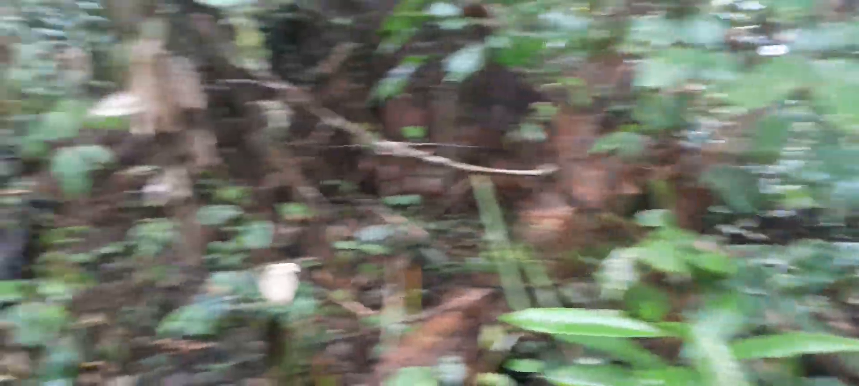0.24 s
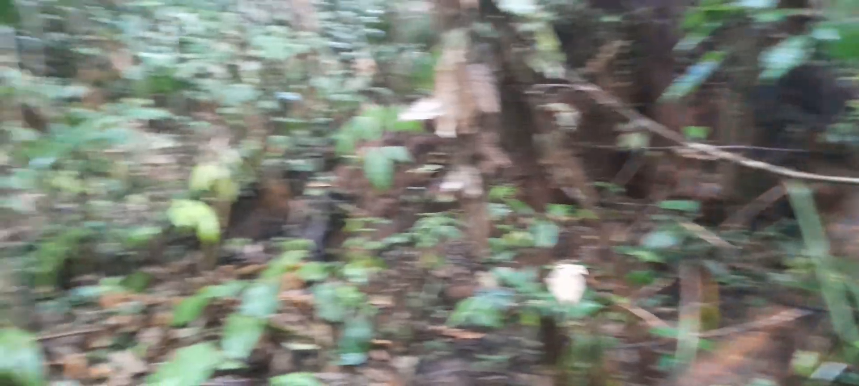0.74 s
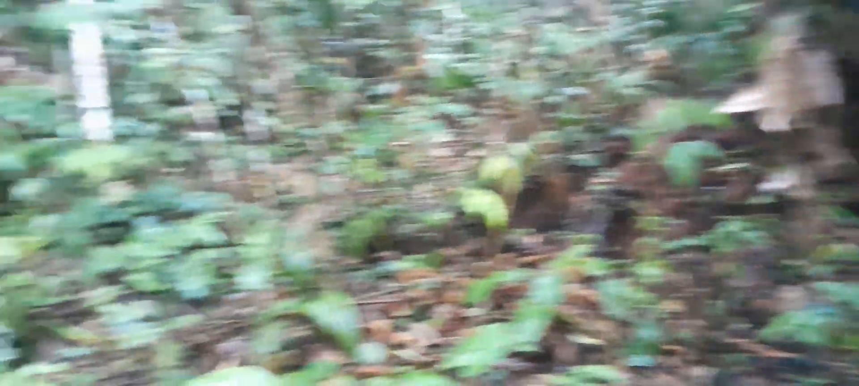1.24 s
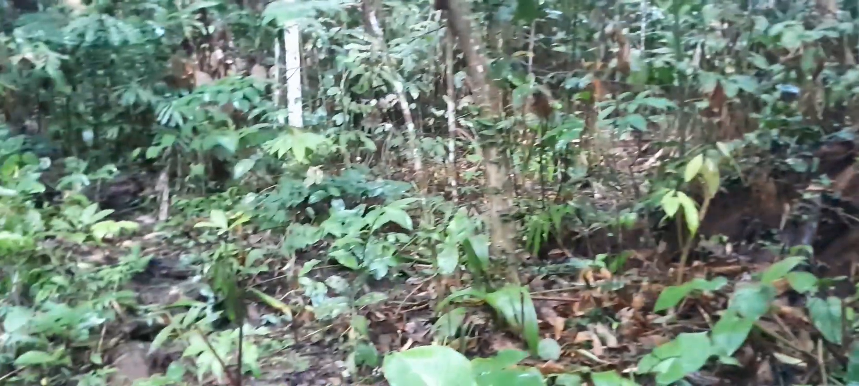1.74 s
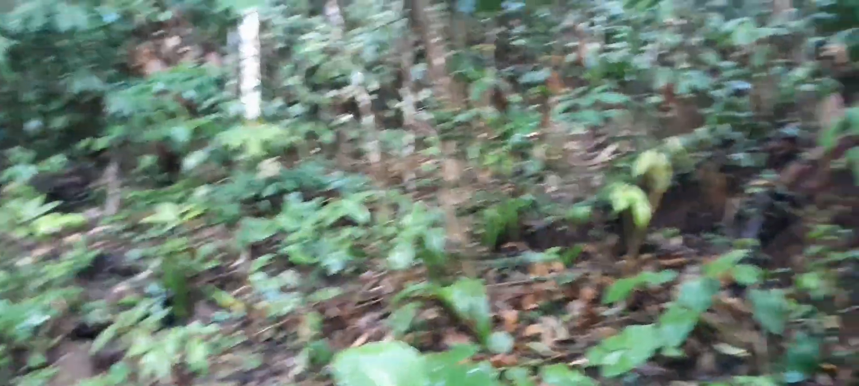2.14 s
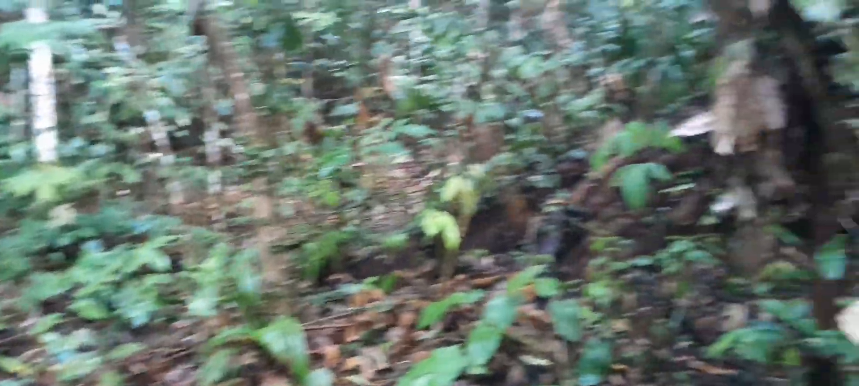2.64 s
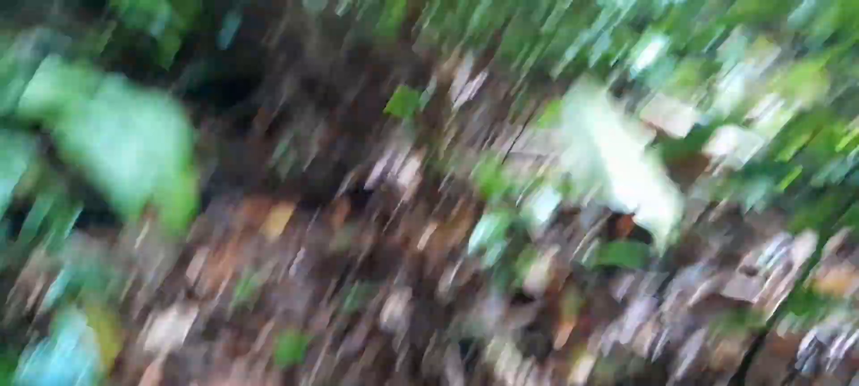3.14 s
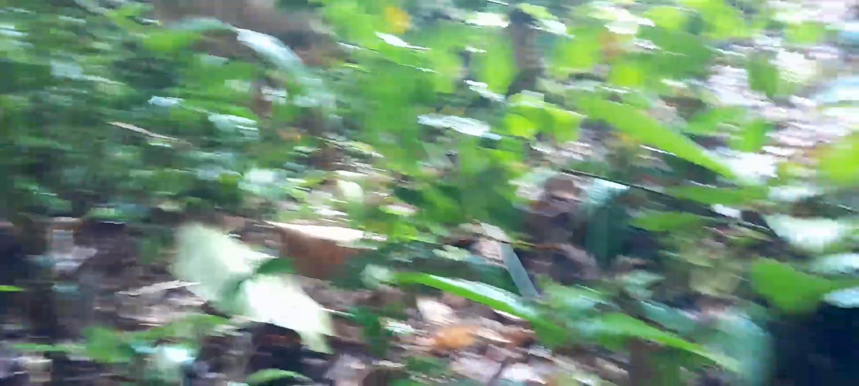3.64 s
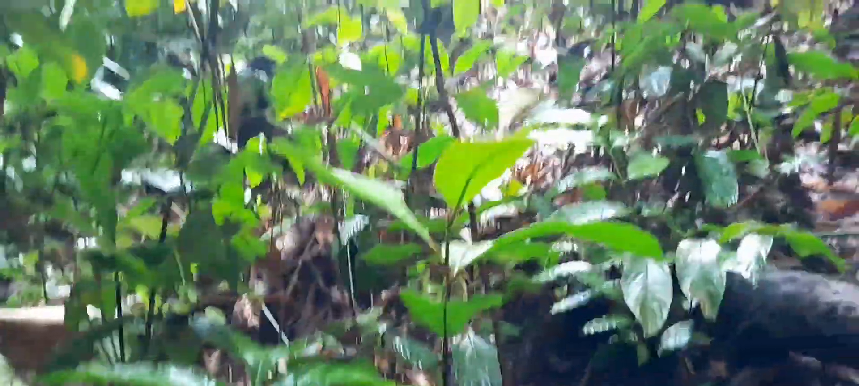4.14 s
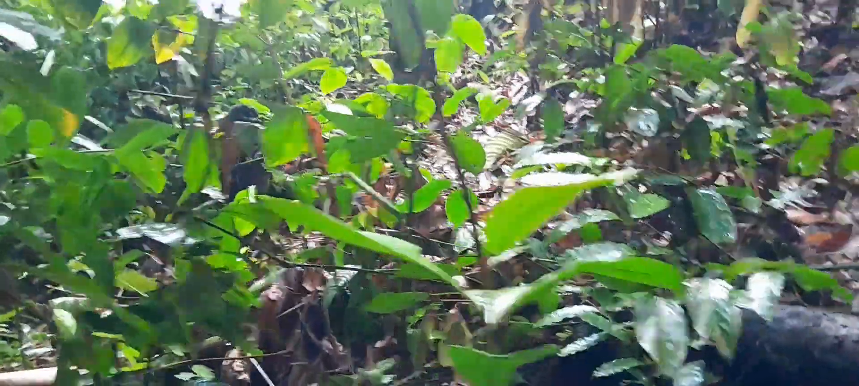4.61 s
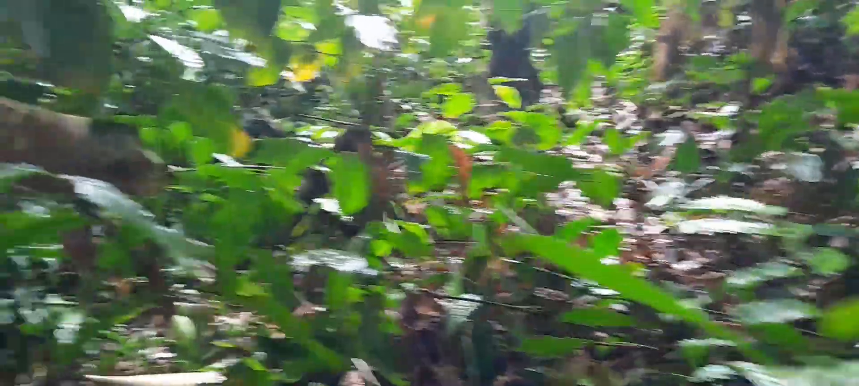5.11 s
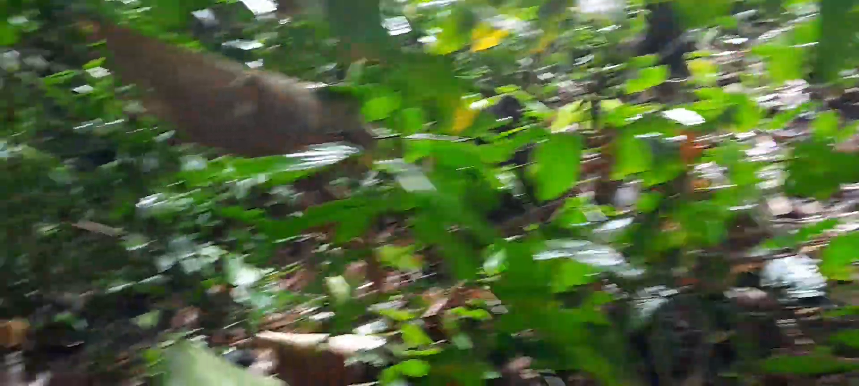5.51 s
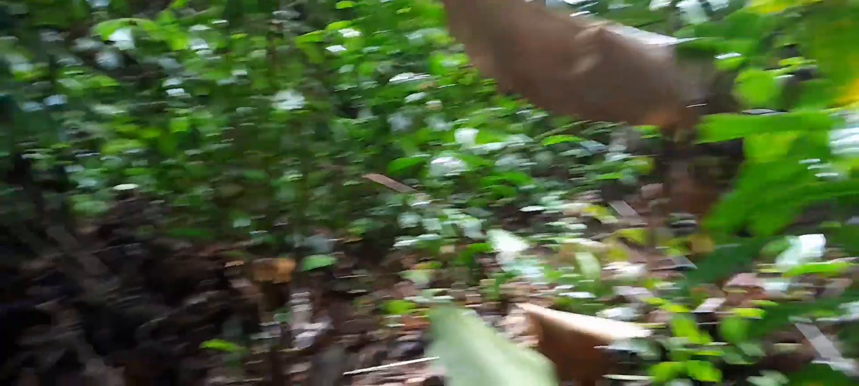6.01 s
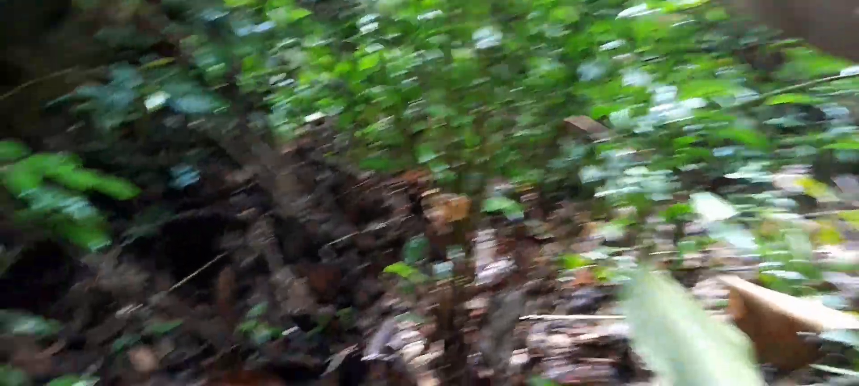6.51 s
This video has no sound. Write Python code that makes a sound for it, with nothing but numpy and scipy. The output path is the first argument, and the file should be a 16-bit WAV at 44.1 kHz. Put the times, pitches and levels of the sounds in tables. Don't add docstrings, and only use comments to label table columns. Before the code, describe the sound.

Outdoors in tropical forest, a handheld stereo microphone hears quiet air and a steady, shimmering high insect chorus throughout. From 0 to 2.9 s, footsteps crackle softly in leaf litter with dull twig ticks, notably around 1.0, 1.6 and 2.1; faint buzzy bird slides echo at 0.2, 1.5 and 2.6, and a distant caller hoots near 0.4 and 2.4. At 2.92 comes a tiny silence, then the ambience changes. Finger bumps at 3.0 lead to a scrape and a very loud, sharp knock at 3.08, mostly left, dying in rumble and rubbing. Soft low coos run from 2.94 to 3.6, then return in scattered groups. A rapid pulsing cricket swells, strongest around 4.2-4.5, fading by 6.2, beside a thin whistling one. Nearer twigs snap, especially 3.15-3.4. Bright buzzy chirps burst at 4.1-4.6; six quick upward whistles follow from 4.9 to 5.9. Leaf steps crunch more strongly to the end, 6.76.

```python
import sys
import numpy as np
from scipy import signal
from scipy.io import wavfile

SR = 44100
rng = np.random.default_rng(int(sys.argv[2]) if len(sys.argv) > 2 else 0)


def boost(x):
    u = np.asarray(x, float) / 20
    return 10 ** u


def int16_out(signal):
    q = np.round(np.clip(np.atleast_2d(signal).T, -1, 1) * 32767)
    wavfile.write(sys.argv[1], SR, q.astype(np.int16))


N = 297939

SPLICE_START_S, SPLICE_END_S = 2.9185, 2.9345

# frequency_hz, density_db_per_hz, second_scene_added_db
AIR = [(25, -130, 10), (41, -107, -2), (62, -94, 5.5), (105.5, -101, 2.5), (200, -107, 0), (400, -110, 5.5),
       (800, -107, 3), (1200, -110, 1.5), (2590, -108, -9), (3670, -106, -14), (6560, -108, 11),
       (8000, -112, -12.5), (12240, -113, 11), (15500, -113, -1.5)]
# frequency_hz, correlation (-1 to 1)
LIKENESS = [(60, 0.42), (180, 0.21), (550, 0.56), (1650, -0.66), (4970, 0.36), (15000, -0.82)]
# frequency_hz, left_minus_right_db
PORTS = [(60, 0), (700, 2.5), (1300, -3), (2400, -1), (4400, 7), (8000, -1.5), (11000, -6), (15000, -10)]
# centre_hz, width_hz, first_scene_db, second_scene_db, left_minus_right_db
CHORUS = [
    (1850, 680, -74, -67.5, -5),
    (3100, 700, -74, -77, 20),
    (5650, 470, -60.5, -63, -0.5),
    (7553, 405, -57.5, -55, -1),
    (11270, 830, -85, -84, -38),
    (15300, 420, -112, -85, 14),
    (11343, 49, -87, -100, -12),
]
# time_s, pitch_hz, second_partial_db, third_partial_db
CALL = [(0, 1012, -24, -4), (.03, 1025, -14, -3.5), (.07, 1034, 3, 1), (.12, 1055, 4.5, -0.5),
        (.17, 1064, 4.5, -1), (.25, 1068, -3, -8.5), (.33, 1060, -13, -15)]
# start_s, second_partial_db, third_partial_db, time_stretch (ratio)
CALLS_AT = [
    (0.368, -67, -60, 1.02),
    (2.405, -62.5, -62, 0.873),
]
# share_of_length (0-1), share_of_glide (0-1), level_db
BUZZ_SHAPE = [(0, 0.075, -11), (.35, 0.72, -10.5), (1, 0.84, -21.5)]
# share_of_length (0-1), share_of_glide (0-1), level_db
FLICK_SHAPE = [(0, 0.0079, -17), (.25, 0.0535, -14.5), (0.55, .4, -13), (.85, .95, -2), (1, 0.94, -4)]
# start_s, length_s, first_hz, last_hz, level_db
BUZZES = [
    (0.184, 0.19, 6800, 7400, -52.5),
    (1.453, 0.13, 7630, 6780, -50.5),
    (2.565, 0.27, 6410, 7160, -58),
    (4.132, 0.11, 7160, 4960, -45.5),
    (4.174, 0.07, 7300, 8020, -40),
    (4.301, 0.042, 8020, 8260, -33),
    (4.345, 0.065, 8340, 7900, -43.5),
    (4.511, 0.11, 6220, 4720, -44),
    (4.555, 0.11, 6460, 5360, -47),
    (6.241, 0.17, 5900, 4970, -52),
]
# start_s, length_s, first_hz, last_hz, level_db
FLICKS = [
    (4.918, 0.033, 5780, 7750, -41),
    (5.195, 0.045, 6000, 7610, -43),
    (5.365, 0.046, 6170, 7880, -41.5),
    (5.554, 0.046, 6500, 7480, -43),
    (5.765, .035, 6750, 7360, -41.5),
    (5.905, 0.025, 7330, 7630, -34),
]
# time_s, level_db
CRICKET = [(2.94, -60), (3.3, -57.5), (3.47, -54), (3.88, -51.5), (3.96, -61), (4.05, -51.5), (4.2, -48),
           (4.45, -47.5), (4.75, -55), (5.15, -51.5), (5.4, -59), (5.7, -58), (6.05, -64), (6.2, -79),
           (6.32, -82), (6.45, -87), (6.76, -78)]
# start_s, length_s, level_db, pitch_hz
PHRASES = [(3.14, 0.06, -74, 3160), (3.24, 0.21, -74, 3150), (3.46, 0.26, -71, 3125),
           (3.72, 0.59, -71, 3180), (4.34, 0.16, -71, 3160), (4.51, 0.24, -72, 3145),
           (4.75, .09, -71, 3125), (4.83, .14, -77, 3125), (4.95, .12, -75, 3185), (5.05, 0.19, -70, 3180),
           (5.26, 0.2, -70.5, 3160), (5.46, 0.31, -71.5, 3140), (5.8, .21, -73, 3125),
           (6.0, 0.22, -73, 3185), (6.29, 0.15, -71, 3180), (6.52, 0.24, -71.5, 3160)]
# start_s, length_s, first_hz, last_hz, level_db
COOS = [(.09, 0.069, 455, 467, -83), (2.935, 0.16, 511.6, 515, -50), (3.075, 0.142, 505.4, 508, -51.5),
        (3.2, 0.14, 499.7, 516.6, -52.5), (3.335, 0.11, 499, 512, -56), (3.42, 0.12, 503.5, 519, -58),
        (3.525, 0.086, 500.4, 472, -50.5), (3.578, 0.083, 460, 458, -58.5), (3.799, 0.063, 385, 440, -66),
        (3.837, .055, 438, 457, -59.5), (3.884, 0.067, 440, 417, -69), (4.16, 0.11, 471, 456, -56),
        (4.262, 0.034, 440, 440, -58.5), (4.297, 0.18, 438, 426, -56.5), (4.476, .15, 430.7, 422.4, -66.5),
        (5.549, 0.069, 379, 426, -68.5), (5.594, 0.069, 443, 400, -68.5), (5.816, 0.037, 400, 440, -61),
        (5.841, 0.14, 435, 426, -64), (6.025, .1, 461, 448, -61), (6.111, 0.043, 440, 433, -67),
        (6.159, 0.18, 458.4, 456, -61.5), (6.481, 0.071, 376, 465, -63), (6.547, 0.16, 444, 446, -63.5),
        (6.645, 0.063, 447, 498, -61), (6.69, 0.1, 503, 505, -65)]
# share_of_length (0-1), share_of_glide (0-1), level_db
COO_SHAPE = [(0, 0, -3), (.35, .35, 0), (1, 1, -4)]
# time_s, left_minus_right_db, octave_db
DOVE_BEARING = [(0, 32, -6), (3.2, 18, -23), (3.9, 0, -12), (4.4, -2.5, -36), (5.6, 10.5, -15),
                (5.9, 7, -2), (6.1, 5, -18), (6.76, 4, -4)]
# start_s, length_s, centre_hz, width_octaves, level_db
SCUFFS = [(0.008, 0.48, 615, 0.99, -83), (1.007, 0.063, 696, 0.44, -78.5), (1.01, 0.061, 3230, 0.44, -73),
          (1.389, 0.04, 3500, 0.63, -76), (5.372, 0.11, 900, 1.2, -80), (6.078, 0.064, 1750, .3, -72),
          (2.078, 0.052, 735, 0.53, -79.5), (2.627, 0.059, 740, 0.12, -83), (4.19, 0.037, 246, 1.2, -78),
          (4.316, 0.12, 640, 1.1, -84), (4.99, 0.22, 800, 0.34, -84), (5.707, 0.16, 624, 0.8, -68.5),
          (6.424, 0.061, 1290, 3.6, -65.5)]
# start_s, length_s, level_db, colour_octaves above the lowest crackle
STEPS = [(0, 0.35, -69, 2), (0.241, 0.72, -63, 3.27), (0.995, 0.16, -60, 3.6), (1.318, 0.49, -64.5, 1.43),
         (1.706, 0.29, -59.5, 3.38), (1.956, 0.26, -72.5, 0.83), (2.203, 0.98, -64, 3.56),
         (2.716, 0.15, -65.5, 2.57), (2.93, 0.44, -59, 0.73), (3.203, 0.35, -61.5, 2.5),
         (3.429, 0.29, -63.5, 1.8), (3.633, 0.88, -74, 1.1), (4.256, 0.34, -65.5, 2.1),
         (4.474, 0.39, -61, 4.2), (4.903, 0.27, -73, 1.4), (5.348, 0.085, -59, 3.2),
         (5.564, 0.11, -62, 1.7), (5.662, 0.31, -63, 2.6), (5.822, 0.7, -62, 2.6), (6.053, 0.29, -64, 6.2),
         (6.255, 0.14, -58.5, 3.8), (6.34, 0.41, -64, 3.6), (6.572, 0.16, -55.5, 2.5),
         (6.657, 0.37, -57, 3.4)]
# time_s, left_minus_right_db
LEAVES_PAN = [(0, 6), (2.9, -3), (3.16, -5), (3.4, -1.5), (4.6, -4), (5.5, -4), (6.76, -2.5)]
# start_s, peak_db, left_minus_right_db, pitch_hz
FAR_SNAPS = [(0.47, -41, 6, 3570), (1.0135, -42, 16, 3260), (1.03, -45, -4, 2950), (1.094, -44, 0, 3900),
             (1.39, -52, 9, 3520), (1.545, -48.5, 0, 1370), (1.607, -39, -1, 4400), (1.793, -43, -8, 3560),
             (2.0748, -38, 16, 3100), (2.267, -45, 10, 3440), (2.763, -48.5, 22, 900)]
# start_s, peak_db, left_minus_right_db, pitch_hz
NEAR_SNAPS = [(3.151, -36.5, 14, 910), (3.237, -45, -4.5, 1250), (3.254, -43.5, -5, 1740),
              (3.279, -41, 2, 1015), (3.299, -41, 1, 1410), (3.3395, -35.5, -4, 1080), (3.33, -40, 0, 410),
              (3.3628, -39.5, -4, 1670), (3.398, -43, -16, 1760), (3.538, -42.5, -15, 1450),
              (4.309, -44, -7, 1620), (4.336, -45, -9, 1740), (4.577, -42, -4, 1757),
              (4.602, -39.5, -8, 1930), (4.825, -46, 12, 3100), (5.369, -39, -9, 940),
              (5.368, -42, -4, 4500), (5.986, -45, -3, 2070), (6.089, -40.5, -9, 1850),
              (6.3055, -47, -13, 5100), (6.447, -48, 8, 3650), (6.642, -36, -9, 860)]
# start_s, peak_db, left_minus_right_db, pitch_hz
BRIGHT_SNAPS = [
    (0.325, -54, -22, 908),
    (3.49, -54.5, -34, 1090),
    (4.682, -41.5, -3, 1970),
    (4.722, -40, -3, 1920),
    (4.781, -45, 10, 3180),
    (5.587, -34, -11, 1730),
    (6.169, -64, -22, 2110),
    (6.735, -48, -4, 3100),
]
# start_s, crack_db, crack_hz, thump_db, thump_hz
KNOCKS = [(2.757, -60, 200, -65, 74.5), (3.001, -20.5, 1840, -12.5, 530), (3.008, -44, 1200, -32, 149),
          (3.0421, -22, 2000, -40, 500), (3.0547, -18.5, 1750, -25, 610), (3.0648, -28, 1810, -36, 715),
          (3.0679, -15, 2320, -12.5, 780), (3.071, -25, 2210, -43, 600), (3.0779, 6.5, 5300, -2, 1380),
          (3.0867, -13, 5000, -6.5, 560), (3.099, -55, 3000, -22, 200), (3.098, -60, 300, -27, 69),
          (2.774, -80, 300, -65, 52), (3.122, -45, 900, -27, 450), (3.134, -41, 900, -45, 500),
          (3.016, -60, 900, -36, 180)]
# time_s, level_db
RUB = [(2.935, -46), (3.0, -45), (3.06, -42), (3.088, -36), (3.11, -43), (3.16, -48.5), (3.25, -94)]
# time_s, level_db
SCRAPE = [(3.062, -44), (3.067, -18), (3.076, -31.5), (3.084, -37)]


def rms_one(x):
    return x / np.sqrt(np.mean(x ** 2) + 1e-20)


def in_time(rows, quiet=None):
    s, *columns = np.transpose(rows)
    return [np.interp(np.arange(N) / SR, s, c, quiet, quiet) for c in columns]


def at_hz(points, hz, column=1):
    return np.interp(np.log(hz), np.log(np.array(points)[:, 0]), np.array(points)[:, column])


def band(x, low_hz, high_hz, order=2):
    return signal.sosfilt(signal.butter(order, [low_hz, min(high_hz, .45 * SR)], "band", fs=SR, output="sos"), x)


def drift(rate_hz):
    r = np.exp(-80 * np.pi * rate_hz / SR)
    slow = signal.lfilter([1], [1, -2 * r, r * r], rng.standard_normal(N // 40 + 2002))[2000:]
    return np.interp(np.arange(N) / 40, np.arange(len(slow)), rms_one(slow))


def pan(x, db):
    return np.array([x * boost(db / 2), x * boost(-db / 2)])


def ring(clicks, hz, t60_s):
    r, w = boost(-60 / (t60_s * SR)), 2 * np.pi * hz / SR
    return signal.lfilter([0, np.sin(w)], [1, -2 * r * np.cos(w), r * r], clicks + 1e-18)


def shaped(shape, s, length_s, first_hz, last_hz, db):
    glide_hz = last_hz - first_hz
    return [(s + along * length_s, first_hz + glide * glide_hz, db + more_db) for along, glide, more_db in shape]


def note(rows, fade_s):
    s, *columns = np.transpose(rows)
    span = np.arange(int(s[0] * SR), min(int(s[-1] * SR), N))
    hz, *columns = [np.interp(span / SR, s, c) for c in columns]
    window = np.clip(np.minimum(span / SR - s[0], s[-1] - span / SR) / fade_s, 0, 1)
    return span, 2 * np.pi * np.cumsum(hz) / SR, np.sqrt(2) * window, columns


def forest(x, t60_s):
    t = np.arange(int(t60_s * SR)) / SR
    echo = rng.standard_normal((2, len(t))) * boost(-60 * t / t60_s) * np.minimum(t / 0.0056, 1)
    return signal.fftconvolve(x[None], echo / np.sqrt(np.sum(echo ** 2) / 2), axes=1)[:, :N]


def burst(hz, cycles, soft):
    turns = np.arange(int(SR * .1)) * hz / SR
    return np.sin(2 * np.pi * turns) * boost(-60 * turns / cycles) * np.minimum(turns / soft, 1) * 1.53


def add(out, s, x):
    i = round(s * SR)
    out[:, i:i + x.shape[1]] += x[:, :N - i]


def air(second, patchy_db):
    out = 0
    edges = 22 * 2 ** np.arange(0, 10, .5)
    white = rng.standard_normal((2, 2, N)) * np.sqrt(SR / 2)
    for k, (low, high) in enumerate(zip(edges, edges[1:])):
        mid, side = band(white[k % 2], low, high)
        hz = np.sqrt(low * high)
        alike = np.clip(at_hz(LIKENESS, hz), -1, 1)
        level_db = at_hz(AIR, hz) + at_hz(AIR, hz, column=2) * second + patchy_db * drift(1.46)
        gain = pan(boost(level_db), at_hz(PORTS, hz))
        out = out + gain * (np.sqrt(1 + alike) * mid + np.sqrt(1 - alike) * side * [[1], [-1]])
    return out


def chorus(second, shimmer_db, swell_db):
    out = 0
    for hz, width_hz, first_db, second_db, pan_db in CHORUS:
        hiss = rms_one(band(rng.standard_normal((2, N)), hz - width_hz / 2, hz + width_hz / 2))
        level_db = np.where(second, second_db, first_db) + shimmer_db * drift(37) + swell_db * drift(5.8)
        out = out + hiss * pan(boost(level_db - 1.5), pan_db)
    return out


def far_caller():
    call, waver = np.zeros(N), drift(53)
    flutter = boost(3.5 * np.roll(waver, 5000))
    for s, second_db, third_db, stretch in CALLS_AT:
        rows = np.add(np.multiply(CALL, [stretch, 1, 1, 1]), [s, 0, second_db, third_db])
        span, phase, window, (second_db, third_db) = note(rows, 0.01)
        phase = phase + 0.57 * waver[span]
        partials = boost(second_db) * np.sin(2 * phase) + boost(third_db) * np.sin(3 * phase)
        call[span] = window * flutter[span] * partials
    return (boost(-6) * forest(call, 0.5) + boost(-1.5) * call) * boost([[3.5], [-3.5]])


def songbirds(dry_db, octave_db, warble_hz):
    song, waver = np.zeros(N), drift(53)
    notes = [(BUZZ_SHAPE, 0.13, row) for row in BUZZES] + [(FLICK_SHAPE, 0.0091, row) for row in FLICKS]
    for shape, share, row in notes:
        depth_hz = 60 + share * abs(row[3] - row[2])
        span, phase, window, (level_db,) = note(shaped(shape, *row), 0.00025)
        phase = phase + depth_hz / warble_hz * np.sin(2 * np.pi * warble_hz * span / SR + waver[span])
        song[span] += window * boost(level_db + 4.5) * (np.sin(phase) + boost(octave_db) * np.sin(2 * phase))
    direct = np.array([song, 0.84 * np.roll(song, -2)])
    return boost(dry_db) * direct + boost(-2.5) * forest(song, 0.62)


def whistling_cricket(wet_db):
    x, flutter_db, waver = np.zeros(N), 2.5 * drift(21.5), 0.55 * drift(22)
    for s, length_s, db, hz in PHRASES:
        sag_hz = 100 * length_s / 2
        span, phase, window, _ = note([(s, hz + sag_hz), (s + length_s, hz - sag_hz)], 0.034)
        x[span] += window * boost(db + flutter_db[span]) * np.sin(phase + waver[span])
    return pan(x, 2.5) + boost(wet_db) * forest(x, .25)


def pulsing_cricket(second):
    song_hz, pulse_hz, pulse_s, duty = 7366, 43.41, 4.0115, .57
    level_db, = in_time(CRICKET)
    t = np.arange(N) / SR
    count, beat = np.divmod((t - pulse_s) * pulse_hz + 200.5, 1)
    start, force = rng.standard_normal((2, 400))
    start, force = np.cumsum(start)[count.astype(int)], force[count.astype(int)]
    stroke = np.clip((duty / 2 - np.abs(beat - .5)) / .06, 0, 1) * boost(1 - 11 * np.abs(beat - .4))
    stroke = stroke * (1 + .15 * np.sin(2 * np.pi * 255 * t))
    phase = 2 * np.pi * np.cumsum(song_hz - 100 * (beat - .5)) / SR + 2.5 * start
    x = second * boost(level_db + 8) * boost(.8 * force) * stroke
    direct = pan(x, -6) * np.sin(phase + np.array([[0], [1.7]]))
    return direct + boost(-20) * forest(x * np.sin(phase), .15)


def dove(wet_db, lag_rad):
    dry, waver, flutter_db = np.zeros((2, N)), .3 * drift(12), 2.3 * drift(22)
    pan_db, octave_db = in_time(DOVE_BEARING)
    for row in COOS:
        span, phase, window, (level_db,) = note(shaped(COO_SHAPE, *row), 0.012)
        phase = phase + waver[span] + np.array([[0], [lag_rad]])
        tone = np.sin(phase) + boost(octave_db[span]) * np.sin(2 * phase)
        dry[:, span] += pan(window * boost(level_db - 0.5 + flutter_db[span]), pan_db[span]) * tone
    return dry + boost(wet_db) * forest(dry[0], 0.14)


def scuffs(grit_db):
    out, grit, white = np.zeros((2, N)), boost(grit_db * drift(47)), rng.standard_normal((2, N))
    for s, length_s, hz, octaves, db in SCUFFS:
        span = np.arange(int(s * SR), int((s + length_s) * SR))
        shape = np.sin(np.pi * np.linspace(0, 1, len(span)) ** 0.54) * grit[span]
        rasp = rms_one(band(white[:, span], hz * 2 ** (-octaves / 2), hz * 2 ** (octaves / 2)))
        add(out, s, rasp * pan(boost(db + 15) * shape, -4))
    return out


def leaves(per_s, spread_db, cycles, clump_db):
    s, length_s, db, colour = np.transpose(STEPS)
    pan_db, = in_time(LEAVES_PAN)
    along = np.clip((np.arange(N) / SR - s[:, None]) / length_s[:, None], 0, 1)
    press = np.sin(np.pi * along ** 0.7) ** 2
    slope = np.where(s < SPLICE_START_S, 18, 1.5)
    born = rng.random((2, N)) < per_s * boost(clump_db * drift(25)) / SR
    sizes = boost(spread_db * np.minimum(rng.exponential(1, (2, N)), 5)) * rng.choice([-1, 1], (2, N)) * born
    pitches, dealt, out = np.geomspace(330, 14300, 18), rng.integers(0, 18, (2, N)), 0
    for k, hz in enumerate(pitches):
        above = np.log2(hz / pitches[0]) - colour
        level = boost(db - 4.5 - slope * np.abs(above) + 0.5 * np.minimum(above, 0)) @ press
        grains = rms_one(ring(sizes * (dealt == k), hz, cycles / hz + 0.003))
        out = out + grains * pan(level, pan_db + at_hz(PORTS, hz))
    return out


def snaps(wet_db, tail_s):
    kinds = ((FAR_SNAPS, -30), (NEAR_SNAPS, -4), (BRIGHT_SNAPS, 8.5))
    twigs = [(*row, bright_db) for rows, bright_db in kinds for row in rows]
    out, crackle = np.zeros((2, N)), rng.standard_normal((len(twigs), 2, int(SR * .1)))
    fall = boost(-60 * np.arange(crackle.shape[2]) / SR / 0.017)
    for (s, db, pan_db, hz, bright_db), noise in zip(twigs, crackle):
        tick = 0.6 * burst(hz, 8.2, 0.33) + 0.8 * band(noise * fall, hz * 0.63, hz * 1.55, order=1)
        tick = tick + boost(bright_db - 12) * band(noise * fall, 4300, 13500, order=1)
        add(out, s, pan(boost(db), pan_db)[:, None] * tick)
    return out + boost(wet_db) * forest(out.mean(axis=0), tail_s)


def mesh():
    out = np.zeros((2, N))
    add(out, KNOCKS[8][0], -burst(14800, 12, 2.5) * boost([[-9], [-35]]))
    return out


def knocks():
    slip_s, slip_db, slip_t60_s = 3.0862, -40, 0.23
    out = np.zeros((2, N))
    for s, crack_db, crack_hz, thump_db, thump_hz in KNOCKS:
        shield_db = 54 + 1.2067 * max(crack_db, thump_db)
        blow = -boost(thump_db) * burst(thump_hz, 2.9, 0.37) + boost(crack_db) * burst(crack_hz, 4, 0.4)
        sign = (-1) ** round(s * SR)
        add(out, s, blow * boost([[0], [-shield_db]]) * [[1], [sign]])
    rumble_db, = in_time(RUB, quiet=-150)
    scrape_db, = in_time(SCRAPE, quiet=-150)
    since = np.arange(N) / SR - slip_s
    rub_db = np.where(since < 0, -150, slip_db - 60 * since / slip_t60_s)
    scrape = band(rng.standard_normal(N), 1100, 2900) * boost(scrape_db) * boost([[0], [-20]])
    white = rng.standard_normal((2, N))
    rumble = rms_one(band(white, 40, 470, order=1)) * boost(rumble_db + 0.77 * drift(77)) * boost([[0], [-13]])
    rub = rms_one(band(white, 1460, 10800, order=3)) * boost(rub_db + drift(83)) * boost([[0], [-16]])
    return band(out + rumble + rub + scrape, 35, 19000)


def low_pass(x, stop_hz):
    return signal.sosfilt(signal.cheby2(14, 60, stop_hz, fs=SR, output="sos"), x)


def scene():
    second = np.arange(N) / SR > SPLICE_START_S
    around = air(second, patchy_db=1.5) + chorus(second, shimmer_db=1, swell_db=0.96)
    around += far_caller() + songbirds(dry_db=-3, octave_db=-20, warble_hz=110.5)
    around += whistling_cricket(wet_db=-7) + pulsing_cricket(second) + dove(wet_db=-6, lag_rad=.75)
    around += scuffs(grit_db=2.5) + leaves(per_s=3500, spread_db=1.6, cycles=16, clump_db=3.5)
    around += snaps(wet_db=-8, tail_s=0.16) + knocks()
    return low_pass(around, 16100) + mesh()


def roll_off(x):
    return signal.sosfilt(signal.butter(12, 17020, fs=SR, output="sos"), x)


def record(dry):
    t = np.arange(N) / SR
    gate = np.clip(np.maximum(SPLICE_START_S - t, t - SPLICE_END_S) / 0.00073, 0, 1)
    rounded = .95 * np.tanh(dry * gate / .95)
    return roll_off(low_pass(rounded, 17150))


dry = scene()
out = record(dry)
int16_out(out)
```